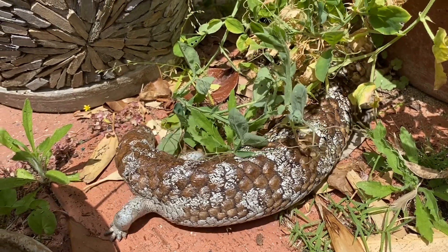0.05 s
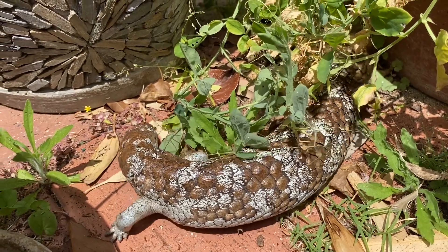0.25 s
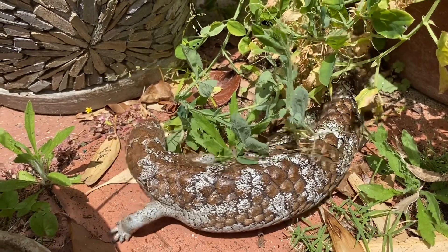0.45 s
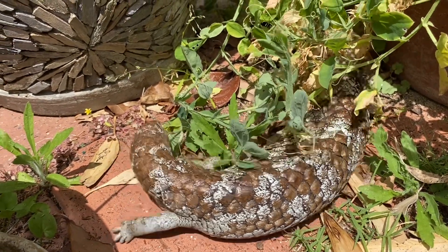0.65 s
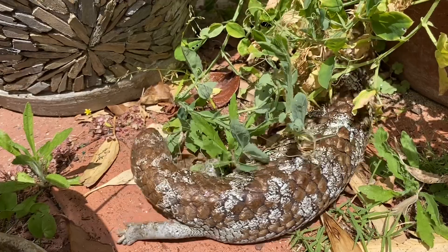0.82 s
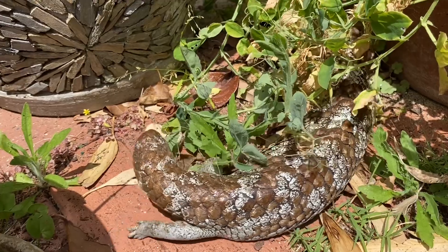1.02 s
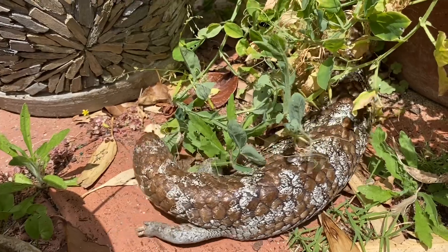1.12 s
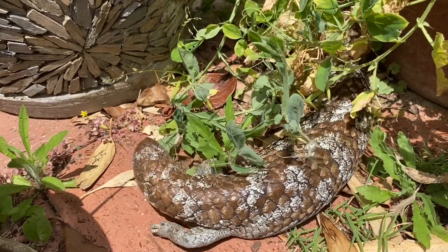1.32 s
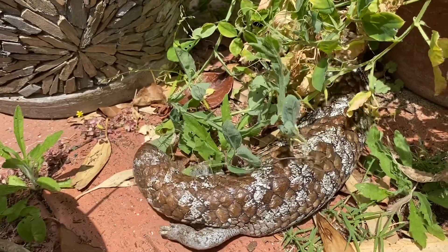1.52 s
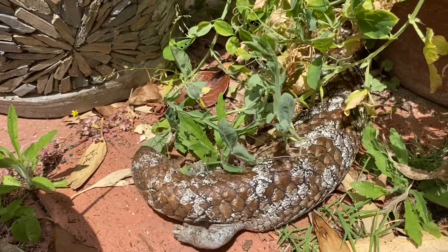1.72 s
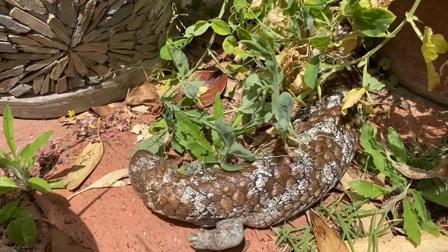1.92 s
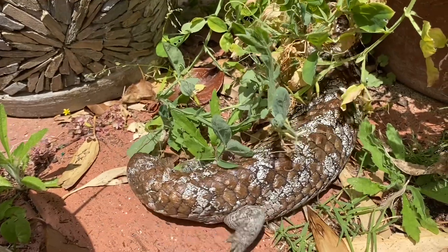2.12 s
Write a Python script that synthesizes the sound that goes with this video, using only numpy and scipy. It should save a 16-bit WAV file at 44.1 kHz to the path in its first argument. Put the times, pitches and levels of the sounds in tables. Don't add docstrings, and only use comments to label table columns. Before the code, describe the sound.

Dry leaves crackle as a lizard drags through plants. Nearly quiet at first, small ticks build from 0.1 s into sharp, brittle snaps around 0.3 to 0.7 s, loudest near 0.5. A lull follows, then lighter crackles from 1.1 to 1.3, sparse ticks, and a thin, bright flurry at 1.7 to 1.9. Fine scaly rustle, faint paving knocks and low distant traffic hum continue underneath; close, dry, outdoors.

```python
import sys
import numpy as np
from scipy import signal
from scipy.fft import rfft, irfft, next_fast_len
from scipy.io import wavfile
from scipy.ndimage import uniform_filter1d, minimum_filter1d

SR = 44100
rng = np.random.default_rng(int(sys.argv[2]) if len(sys.argv) > 2 else 0)


def digitize_waveform(pressure):
    field = np.atleast_2d(pressure).T
    bounded = np.clip(field, -1, 1)
    quanta = np.round(bounded * 32767).astype(np.int16)
    wavfile.write(sys.argv[1], SR, quanta)


def natural_amplitude(level_db):
    exponent = np.asarray(level_db, float) / 20
    return 10 ** exponent


N = 94815

# start in seconds, peak level in dB, ring pitch in Hz, thud in dB, treble in dB.
LEAF_SNAPS = [(0.0034, -44, 5900, -39, -11), (0.0823, -38.5, 10300, -17, -11),
              (0.0926, -28, 7200, -43, -21.5), (0.121, -37, 5200, -24, -16),
              (0.1709, -32, 11400, -18, -17), (0.1804, -38, 7250, -5, -23), (0.2046, -39, 3180, -30, -8),
              (0.2292, -26, 6180, -40, -21), (0.237, -36, 11100, -32, -10),
              (0.2759, -29.5, 11100, -22, -16), (0.296, -18, 4420, -36, -18),
              (0.3232, -18, 3150, -40, -19.5), (0.3426, -23, 14870, -49, -12),
              (0.3614, -33, 6500, -32, -12),
              (0.412, -19.5, 6800, -50, -12.5), (0.429, -21.5, 6450, -44, -21),
                (0.4523, -27.5, 6950, -46, -23), (0.4571, -19, 6380, -50, -12.5),
                (0.465, -30.5, 4500, -29, -20), (0.471, -24.5, 11150, -28, -14),
                (0.5079, -15.5, 6150, -31, -14), (0.5134, -16, 10200, -48, 1),
                (0.6236, -21, 7260, -26, -13), (0.6351, -17, 9750, -19.5, -15.5),
                (0.659, -34, 15300, -22, -14), (0.6649, -23, 6290, -34, -22), (0.685, -34, 10500, -16, -14),
                (0.7443, -37.5, 4830, -8, -15), (0.8708, -33, 14600, -16, -16),
                (0.9505, -32, 6700, -18, -15),
              (1.137, -25.5, 15000, -14, -16), (1.1697, -32, 15000, -39, -10),
               (1.172, -21.5, 5060, -30, -19), (1.1922, -45, 6000, -17, -11),
               (1.2022, -28, 14700, -24, -11), (1.2355, -26, 14660, -11.5, -14),
               (1.2842, -32.5, 15200, -9, -14), (1.3109, -31, 12100, -13, -14),
               (1.418, -34.5, 3960, -7, -24), (1.517, -29, 4920, -13, -9), (1.6042, -37, 15030, -15, -16),
               (1.7259, -33, 12100, -5.5, 10), (1.7384, -33, 11900, -20, -3), (1.7571, -30, 12400, -8, -6),
               (1.767, -36.5, 14500, -8, -1), (1.7734, -29.5, 14100, -8, -20),
               (1.8153, -33.5, 12000, -16, -5), (1.8737, -25.5, 14700, -13, 12),
               (1.8848, -28, 5720, -20, -8), (2.1257, -35.5, 10950, -24.5, -9),
              (0.026, -49, 10000, -15, -14), (0.0652, -47, 10200, -26, -12), (0.2718, -35, 10800, -33, -6),
               (0.3293, -33, 6500, -37, -20), (.338, -38, 11000, -35, -10), (.38, -32.5, 3600, -31, -20),
               (.4965, -32, 7200, -35, -16), (0.847, -41, 5660, -21, -30), (1.1123, -44, 6090, -12, -21),
               (1.1645, -39, 14500, -25, -17), (1.23, -40, 12000, -23, -9), (1.4135, -36.5, 4680, -8, -17),
               (1.493, -37, 7500, -24, -26), (1.4974, -34, 5300, -6, -28), (1.53, -35, 14900, -30, -5),
               (1.551, -43, 4500, 6, -19), (1.617, -39, 4760, -7, -10), (1.7105, -42, 12000, -18, -6),
               (1.8437, -42, 6680, -22, -22), (1.8658, -39, 14500, -25, -13), (1.871, -37, 14600, -23, -6),
               (1.892, -36, 14600, -23, -20), (1.975, -37.5, 3860, -19, -15),
               (2.006, -42.5, 4250, -28, -26), (2.018, -41, 11300, -28, -17)]
# frequency in Hz, level in dB.
LEAF_COLOUR = [(400, -22), (1500, -20.5), (2500, -9.5), (3050, 1.5), (5500, 2), (8500, 3.5), (14500, 3.5),
               (16500, -30)]
# start in seconds, peak level in dB, pitch in Hz.
LEAF_PINGS = [(0.2959, -25.5, 3090), (.2961, -21, 14300), (0.296, -28, 7200), (.2961, -33, 11800),
              (.3235, -24.5, 3095), (.5078, -23, 11740), (0.5084, -32, 4680), (0.514, -25.5, 4520),
              (0.5117, -35, 10700), (1.1374, -40, 1560), (1.1378, -42.5, 2300), (1.138, -38.5, 4800),
              (1.1717, -31.5, 7600), (1.1722, -27.5, 10440), (1.2033, -27, 4910), (1.2055, -36, 15300),
              (1.2026, -27, 8240), (1.2027, -31, 11540), (1.2022, -40, 1820), (1.236, -34, 5860),
              (1.4977, -45.5, 1560), (1.52, -40, 3430), (1.886, -35, 12100), (.4292, -31.5, 3080),
              (0.624, -36.5, 3200)]
# time in seconds, level in dB, brightness in dB per octave.
BODY_DRAG = [(0, -65.5, 4), (0.061, -68, -5.5), (.1, -59.5, 0), (.2, -53, 2.5), (.3, -53, -3),
             (.4, -54, 0.5), (.5, -51.5, 1.5), (.56, -51.5, 1), (.7, -52.5, 2), (.82, -55, 0.5),
             (1.0, -53, 0.5), (1.3, -55, 0), (1.6, -53, 0), (1.83, -60, 1), (1.93, -59, 1.5),
             (2.15, -56.5, -1)]
# frequency in Hz, level in dB.
RUSTLE_COLOUR = [(500, -35), (1150, -20), (1600, -9), (2400, -11.5), (3500, -0.5), (5000, -.5),
                 (6800, -1.5), (8500, -3.5), (15600, -3)]
# start in seconds, length in seconds, extra level in dB.
STEM_SCRAPES = [(.512, 0.013, 14.5), (0.577, 0.14, 6), (1.1, 0.014, 4.5), (2.2, 0.023, 8), (.271, .011, 8),
                (1.894, 0.0092, 2.5), (.866, .013, 5), (.598, .016, 3), (1.6, 0.026, 4), (1.76, 0.013, 5),
                (1.867, 0.035, 12.5)]
# start in seconds, peak level in dB, pitch in Hz.
PAVING_KNOCKS = [
    (0.274, -51, 490),
    (0.516, -49.5, 460),
    (0.634, -49.5, 500),
    (0.686, -49, 576),
    (0.745, -51, 550),
    (0.871, -55, 736),
    (0.951, -60, 620),
    (1.136, -59, 746),
    (1.72, -53, 670),
    (1.875, -50.5, 660),
]
# frequency in Hz, level in dB per Hz.
HUM_COLOUR = [(12, -35), (20, -53), (49, 4), (86, 3.5), (131, -3), (188, -8), (840, -18.5), (1770, -19),
              (2500, -15), (3250, -41), (5500, -120)]
# frequency in Hz, left-right likeness (1 is identical).
HUM_LIKENESS = [(60, 0.97), (140, 0.96), (300, 0.7), (600, 0.27), (1200, 0.12), (2500, 0.69)]

LEAD = 256
PIVOT_HZ = 6500


def snap(level_db, ring_hz, thud_db, treble_db):
    rise_s, crack_s, shiver_s, creak_s = 0.00098, 0.0017, 0.0041, 0.0013
    shiver_db, creak_db, ring_db = -14.5, -15, -4
    t = (np.arange(2048) - LEAD) / SR
    after = np.maximum(t, 0)
    hz = np.fft.rfftfreq(2048, 1 / SR)
    fracture_noise, ring_noise = rng.standard_normal((2, 2048))

    rise = 1 - np.exp(-(after / rise_s) ** 2)
    crack_fade = np.exp(-(after / crack_s) ** 2)
    shiver_fade = natural_amplitude(shiver_db) * np.exp(-after / shiver_s)
    creak = natural_amplitude(creak_db) * np.exp(-abs(t) / creak_s)
    shape = rise * (crack_fade + shiver_fade) + creak
    fractures = fracture_noise * (0.51 + abs(ring_noise)) * shape

    brightness = 0.5 * (treble_db + 18)
    gain = natural_amplitude(read(LEAF_COLOUR, hz) + brightness * tilt(hz))
    gain = gain / np.sqrt(np.mean(gain ** 2))
    gain = gain + natural_amplitude(thud_db + 9) / (1 + ((hz - 1620) / 430) ** 2)
    log_gain = np.log(np.concatenate([gain, gain[-2:0:-1]]) + 1e-5)
    colour = np.fft.ifft(np.exp(np.conj(signal.hilbert(log_gain)))).real
    crack = signal.fftconvolve(fractures, colour[:512])[:2048]

    width_hz = 420 * np.sqrt(ring_hz / PIVOT_HZ)
    strike = ring_noise * rise * np.exp(-after / 0.00018)
    ringing = ring(ring(strike, ring_hz, width_hz), ring_hz, 2 * width_hz)
    sound = evened(crack) + natural_amplitude(ring_db) * evened(ringing)
    loudest = np.sqrt(uniform_filter1d(sound ** 2, size=40).max())
    return natural_amplitude(level_db - 6.5) * sound / loudest


def snaps():
    out = np.zeros(N + 4096)
    for start, *settings in LEAF_SNAPS:
        out[round(start * SR):][:2048] += snap(*settings)
    return out[LEAD:N + LEAD]


def pings():
    out, t = np.zeros(N + 1024), np.arange(1024) / SR
    swell = 1 - np.exp(-(t / 0.00032) ** 2)
    for start, level_db, hz in LEAF_PINGS:
        width_hz = 284 * np.sqrt(hz / PIVOT_HZ)
        shape = swell * np.exp(-np.pi * width_hz * t)
        tone = np.sin(2 * np.pi * (hz * t + rng.random()))
        out[round(start * SR):][:1024] += natural_amplitude(level_db) * shape / shape.max() * tone
    return out[:N]


def rustle():
    ticks_per_s, tick_spread_db, ticks_db, hiss_db = 350, 2.5, 0, 1.5
    sizes = natural_amplitude(tick_spread_db * np.minimum(rng.exponential(1, N), 4))
    ticks = sizes * (rng.random(N) < ticks_per_s / SR)
    puffs = signal.oaconvolve(ticks ** 2, np.exp(-np.arange(300) / (0.0031 * SR)))[:N]
    drive = natural_amplitude(ticks_db) * evened(np.sqrt(abs(puffs))) + natural_amplitude(hiss_db)
    for start, length, scrape_db in STEM_SCRAPES:
        progress = np.clip((np.arange(N) / SR - start) / length, 0, 1)
        drive = drive * natural_amplitude(scrape_db * np.sin(np.pi * progress ** 0.69) ** 0.5)

    hz, t, z = signal.stft(drive * rng.standard_normal(N), SR, nperseg=256, noverlap=192)
    s, level_db, bright_db = np.transpose(BODY_DRAG)
    colour_db = read(RUSTLE_COLOUR, hz)[:, None] + tilt(hz)[:, None] * np.interp(t, s, bright_db)
    z = z * natural_amplitude(colour_db + np.interp(t, s, level_db) + 2.0 * patches(z.shape, 5, 40))
    return signal.istft(z, SR, nperseg=256, noverlap=192)[1][:N]


def knocks():
    out, t = np.zeros(N + 2048), np.arange(2048) / SR
    for start, level_db, hz in PAVING_KNOCKS:
        push = rng.standard_normal(2048) * t * np.exp(-2 * t / 0.0066)
        puff = ring(push, hz, 210)
        out[round(start * SR):][:2048] += natural_amplitude(level_db + 1) * puff / abs(puff).max()
    return out[:N]


def hum():
    level_db, hush_db, hush_s = -56.5, -4.5, 0.09
    frames, hz = N // 512 + 5, np.fft.rfftfreq(2048, 1 / SR)
    a, b, c, d = rng.standard_normal((frames, 1025, 4)).T
    left, other = a + 1j * b, c + 1j * d
    same = np.clip(read(HUM_LIKENESS, hz), -1, 1)[:, None]
    z = np.array([left, same * left + np.sqrt(1 - same ** 2) * other])
    fade_db = -14 * np.log2(np.maximum(hz / 1800, 1))
    z *= natural_amplitude((read(HUM_COLOUR, hz) + fade_db)[:, None] + 1.1 * patches(left.shape, 9, 8))
    z *= natural_amplitude(hush_db * np.outer(hz > 500, np.arange(frames) * 512 / SR < hush_s))
    z /= 1 + (40 / (hz[:, None] + 1)) ** 4
    return natural_amplitude(level_db) * evened(signal.istft(z, nperseg=2048, noverlap=1536)[1][:, :N])


def bounced(x):
    lag, share = round(0.00066 * SR), 0.22
    echo = np.concatenate([np.zeros(lag), x[:-lag]])
    return (x + share * echo) / np.sqrt(1 + share ** 2)


def ports(x):
    from_hz, to_hz, lag_s = 6780, 15470, 0.00023
    echo_s, echo_share, scatter_s, scatter_db = 0.00061, 0.3, 0.003, -15
    size = next_fast_len(N + 4096)
    hz = np.fft.rfftfreq(size, 1 / SR)
    lag = np.exp(-1j * np.pi * lag_s * (np.clip(hz, from_hz, to_hz) - from_hz))
    echo = echo_share * np.exp(-2j * np.pi * hz * echo_s) / (1 + (hz / 6500) ** 8)
    taps = rng.standard_normal((2, 600)) * np.exp(-np.arange(600) / (scatter_s * SR))
    scatter = natural_amplitude(scatter_db) * rfft(taps / np.linalg.norm(taps[0]), size)
    paths = np.array([lag * (1 + echo), (1 - echo) / lag]) + scatter
    return irfft(rfft(x, size) * paths, size)[:, :N]


def ring(x, hz, width_hz):
    r = np.exp(-np.pi * width_hz / SR)
    return signal.lfilter([1, 0, -1], [1, -2 * r * np.cos(2 * np.pi * hz / SR), r * r], x)


def evened(x):
    return x / np.sqrt(np.mean(x ** 2) + 1e-20)


def read(points, hz):
    f, value = np.transpose(points)
    return np.interp(np.log(hz + 1), np.log(f + 1), value)


def tilt(hz):
    return np.log2(np.maximum(hz, 2500) / PIVOT_HZ)


def patches(shape, bins, frames):
    noise = rng.standard_normal(shape[::-1]).T
    smooth = uniform_filter1d(noise, size=bins, axis=0)
    return evened(uniform_filter1d(smooth, size=frames, axis=1))


def scene():
    plants = bounced(snaps() + rustle())
    return ports(plants + knocks() + pings()) + hum()


def thin_stereo(x):
    busy_db, loud_db, low_gate_db, gate_db = 6.8, 13, -9.5, -6.5
    mid_side = np.array([x[0] + x[1], x[0] - x[1]]) / 2
    hz, t, z = signal.stft(mid_side, SR, nperseg=1024)
    band = np.arange(len(hz)) // 16
    bands = np.arange(band[-1] + 1)
    power = np.array([[(abs(c[band == k]) ** 2).mean(0) for k in bands] for c in z])

    treble_db = 10 * np.log10(power[:, 4:].sum((0, 1)) + 1e-20)
    excess_db = treble_db - minimum_filter1d(treble_db, size=7)
    calm = excess_db < busy_db
    calm = calm & (np.roll(excess_db, 1) < loud_db) & (np.roll(excess_db, 2) < loud_db)
    high = (bands >= 4)[:, None] & calm

    power_db = 10 * np.log10(uniform_filter1d(power, size=3, axis=2) + 1e-20)
    gate = np.where(bands < 9, low_gate_db, gate_db)[:, None]
    weaker = power_db - power_db[::-1] < gate
    keep = np.where(high & weaker, 0, 1 + 0j)
    random_phase = np.exp(2j * np.pi * rng.random(high.shape[::-1]).T)
    keep[1] *= np.where(high, random_phase, 1)
    keep[:, 23:] *= excess_db > loud_db
    mid, side = signal.istft(z * keep[:, band], SR, nperseg=1024)[1][:, :N]
    return np.array([mid + side, mid - side])


def low_pass(x):
    return signal.sosfilt(signal.butter(12, 16960, fs=SR, output="sos"), x)


def record(dry):
    x = signal.oaconvolve(dry, signal.firwin(95, 16250, fs=SR)[None], "same")
    return low_pass(thin_stereo(x))


dry = scene()
out = record(dry)
digitize_waveform(out)
```